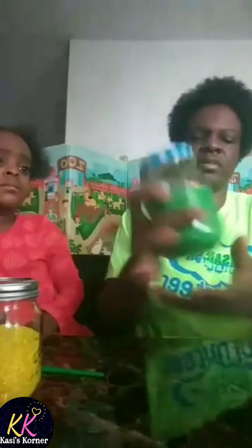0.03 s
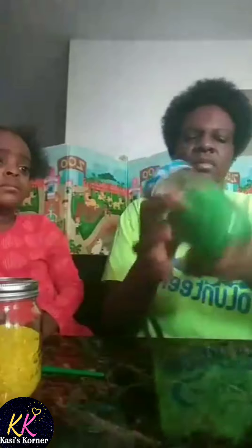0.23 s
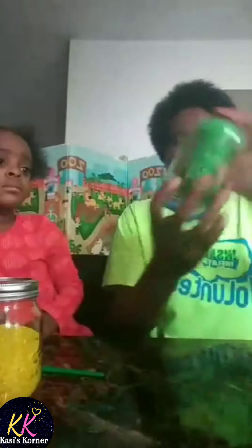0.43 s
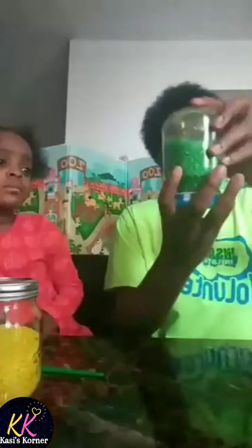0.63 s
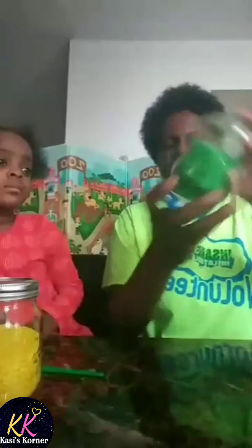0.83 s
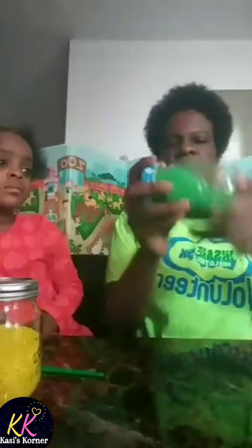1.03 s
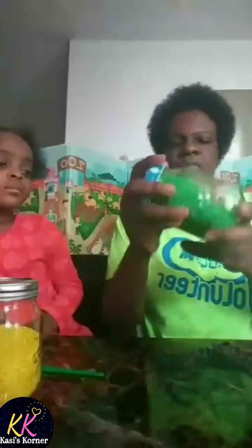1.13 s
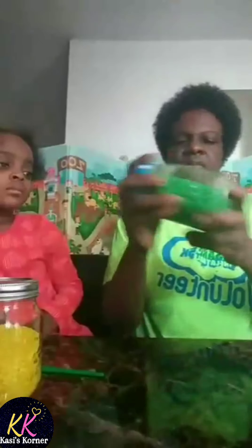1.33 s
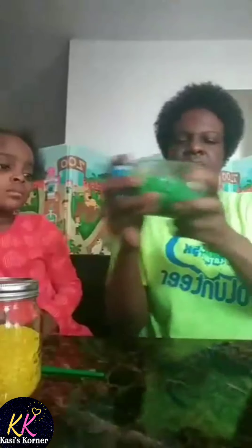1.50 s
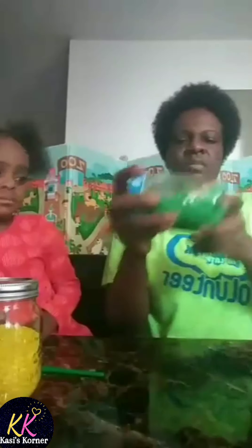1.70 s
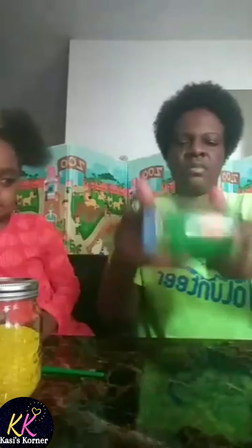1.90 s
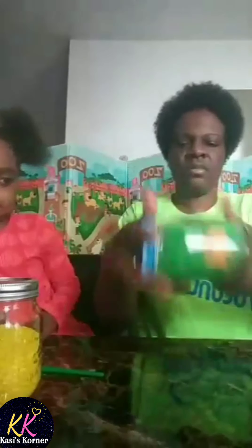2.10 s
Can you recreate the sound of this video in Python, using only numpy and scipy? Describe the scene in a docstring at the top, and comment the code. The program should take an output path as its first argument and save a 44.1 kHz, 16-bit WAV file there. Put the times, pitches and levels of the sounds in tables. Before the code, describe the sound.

Rice rattles and slides in a glass jar as it is turned over and shaken.

```python
"""In a small room, dry rice in a glass jar with a metal lid is turned over and shaken by hand.
Grains slide and patter along the glass and make it ring. At the end of a swing the heap lands
with a crunch, and once it drums loudly on the lid. The jar gives a few sharp clicks, and the
hands bump and rub it dully. Behind it all are a short echo and a faint hiss of air."""
import sys
import numpy as np
from scipy import signal
from scipy.fft import rfft, irfft, next_fast_len
from scipy.io import wavfile

SR = 44100
rng = np.random.default_rng(int(sys.argv[2]) if len(sys.argv) > 2 else 0)


def materialize(psi):
    """Save the field psi as 16-bit PCM at rate SR to the path in sys.argv[1].

    A 1-D psi becomes a single channel; in a 2-D psi each row is a channel.
    """
    bounded = np.clip(np.atleast_2d(psi).T, -1, 1)
    quanta = np.round(bounded * 32767).astype(np.int16)
    wavfile.write(sys.argv[1], SR, quanta)


N = 94815

# The tone of a grain hitting the glass. Each row: frequency in Hz, level in dB.
GRAIN_ON_GLASS = [(90, -35), (170, -24.5), (350, -16), (800, -14.5), (1600, -21.5), (3000, -10.5),
                  (4600, -9.5), (6000, -12.5), (7500, -6.5), (10000, -4.5), (12000, -2), (14100, -4.5)]
# The notes the glass rings at. Each row: frequency in Hz, width in Hz, boost in dB.
GLASS_NOTES = [(5306, 450, 10), (6535, 300, 7), (9015, 450, 12.5), (10550, 520, 3), (11060, 120, 12.5),
               (11400, 69, 10), (11530, 230, 5), (12100, 520, 11.5)]


def amp(db):
    """Turn decibels into a plain multiplier."""
    return 10 ** (np.asarray(db) / 20)


def along(points, hz):
    """Read a curve between its points, on a log frequency scale."""
    freqs, values = np.transpose(points)
    return np.interp(np.log(hz + 1), np.log(freqs + 1), values)


def body(x, tone, notes=(), size=8192):
    """Pass x through an object that colours it with a broad tone and rings at its own notes."""
    hz = np.fft.rfftfreq(size, 1 / SR)
    boost = sum((amp(db) ** 2 - 1) / (1 + (2 * (hz - f) / width) ** 2) ** 2 for f, width, db in notes)
    gain = amp(along(tone, hz)) * np.sqrt(np.abs(1 + boost))
    cepstrum = irfft(np.log(np.maximum(gain, 1e-6)))
    cepstrum[1:size // 2] *= 2  # folding it makes the ring follow the hit, never lead it
    cepstrum[size // 2 + 1:] = 0
    ring = irfft(np.exp(rfft(cepstrum)))
    return signal.fftconvolve(x, ring / np.linalg.norm(ring))[:N]


def grains(per_s, scatter_db, bands=6, band_step_hz=3000):
    """Tiny random hits of uneven size, per_s a second in each pitch band; more are denser, not louder."""
    chance = np.clip(per_s / SR, 1e-4, 1)
    sizes = amp(scatter_db * np.clip(rng.standard_normal((bands, N)), -2, 2))
    sizes *= rng.choice([-1, 1], (bands, N)) / np.sqrt(np.mean(sizes ** 2))
    hits = (rng.random((bands, N)) < chance) * sizes / np.sqrt(chance)
    size = next_fast_len(N)
    offset = np.fft.rfftfreq(size, 1 / SR) / band_step_hz - np.arange(bands)[:, None]
    band_gain = np.sqrt(np.maximum(1 - np.abs(offset), 0))
    return irfft((rfft(hits, size) * band_gain).sum(0), size)[:N]


def swells(rows):
    """A loudness curve: each row rises, holds and fades. A fade time is how long a 60 dB drop takes."""
    t = np.arange(N) / SR
    return sum(np.clip((t - start) / rise, 0, 1)
               * amp(db - 60 * np.maximum(t - start - rise - hold, 0) / fade)
               for start, db, rise, hold, fade in rows)


def blow(start, fade_s, rough_db):
    """One short contact: a snap, then a quickly fading burst of noise."""
    age = np.arange(N) / SR - start
    burst = (age >= 0) * amp(-60 * np.abs(age) / fade_s) * rng.standard_normal(N)
    hit = amp(rough_db) * burst / np.linalg.norm(burst)
    hit[int(start * SR)] += 1  # the snap
    return hit / np.linalg.norm(hit)


def air(level_db=-69):
    """The faint, steady hiss of a still room."""
    # The tone of the hiss. Each row: frequency in Hz, level in dB.
    tone = [(30, -30), (90, -26), (145, 1), (200, -7), (400, -1), (900, -5.5), (1900, -13.5), (4100, -13.5),
            (6900, -20.5), (11800, -14.5)]
    return amp(level_db) * body(rng.standard_normal(N), tone)


def room_echo(x, level_db=-12.5, delay_s=0.007):
    """The walls send back a short, blurred echo whose treble dies first."""
    # How long the echo lasts. Each row: frequency in Hz, fade time in seconds.
    fades = [(150, 0.28), (1000, 0.22), (4000, 0.23), (12000, 0.043)]
    hz, t, noise = signal.stft(rng.standard_normal(SR // 2), SR, nperseg=256)
    tail = signal.istft(noise * amp(-60 * t / along(fades, hz)[:, None]), SR, nperseg=256)[1]
    tail *= np.arange(len(tail)) / SR > delay_s
    return amp(level_db) * signal.fftconvolve(x, tail / np.linalg.norm(tail))[:N]


def hands(bump_width_hz=166, bump_boost_db=9.5):
    """Soft hands bump the jar dully, and skin rubs over it."""
    # The bumps. Each row: start in seconds, level in dB, rise, hold and fade in seconds, pitch in Hz.
    bumps = [(0.453, -65, 0.0068, 0.013, 0.063, 307), (1.277, -55, 0.0092, 0.057, 0.27, 401),
             (1.414, -53.5, 0.004, 0.029, 0.23, 314), (1.531, -54, 0.0052, 0.013, 0.23, 796),
             (1.646, -38.5, 0.0018, 0.027, .13, 205)]
    # The rub. Its row is like a bump's, without the pitch.
    rubs = [(.08, -57, 0.051, 0.047, 0.22)]
    # The tones of a bump and a rub. Each row: frequency in Hz, level in dB.
    bump_tone = [(60, -33), (115, -28), (190, -14.5), (300, -2), (420, 0.5), (490, -10), (570, -3),
                 (700, -3.5), (870, -2.5), (1300, -12), (2300, -10.5), (6000, -24.5)]
    rub_tone = [(100, -33.5), (400, -11.5), (800, -8), (980, -16.5), (1160, 6.5), (1450, -26), (5000, -30)]
    bumping = 0
    for *shape, hz in bumps:
        touch = swells([shape]) * grains(per_s=1500, scatter_db=2.5)
        bumping += body(touch, bump_tone, [(hz, bump_width_hz, bump_boost_db)])
    return bumping + body(swells(rubs) * grains(per_s=2600, scatter_db=7.5), rub_tone)


def clicks():
    """Hard single contacts: the jar clinks in the hands, and grains and clumps tick on the glass."""
    # The clinks and the ticks. Each row: start in seconds, level in dB.
    jar_hits = [(0.1677, -5.5), (0.1856, -15.5), (1.3371, -8)]
    grain_hits = [(.476, -28), (0.545, -43.5), (0.983, -18), (1.4111, -13), (1.621, -10.5), (1.626, -5),
                  (1.946, 4), (1.9579, -7.5), (1.9628, 3), (1.9721, -16), (1.982, -11), (2.07, -30.5)]
    # The tone of a clink. Each row: frequency in Hz, level in dB.
    clink_tone = [(100, -23.5), (1000, -5), (1600, -7), (3900, 4.5), (6200, -9.5), (12200, -3),
                  (13200, -19)]
    # The notes of a clink. Each row: frequency in Hz, width in Hz, boost in dB.
    clink_notes = [(2830, 430, 14.5), (5380, 430, 6), (8160, 1200, 13.5), (14080, 200, 15)]
    clinks = sum(amp(db) * blow(start, fade_s=0.012, rough_db=3.5) for start, db in jar_hits)
    ticks = sum(amp(db) * blow(start, fade_s=0.008, rough_db=10.5) for start, db in grain_hits)
    return body(clinks, clink_tone, clink_notes) + body(ticks, GRAIN_ON_GLASS, GLASS_NOTES)


def lid(hollow_hz=785.4, hollow_width_hz=380):
    """Rice knocks hollowly and patters on the lid, and midway the hands rub faintly on the jar."""
    # The knocks. Each row: start in seconds, level in dB, boost of the hollow note in dB.
    blows = [(0.2607, 2, 15.5), (0.2675, 3.5, 5), (1.337, -23.5, 0), (1.964, -23, 0)]
    # Loose grains on the lid (first and last row) and a faint rub of the hands (middle row).
    # Each row: start in seconds, level in dB, rise, hold and fade in seconds.
    patter_and_rub = [(.262, -37.5, 0.0062, 0.0047, 0.08), (0.8, -67, 0.074, 0.097, 0.81),
                      (1.87, -54.5, 0.042, 0.11, 0.08)]
    # The tone of the lid. Each row: frequency in Hz, level in dB.
    tone = [(30, -26.5), (150, -22.5), (450, -14.5), (720, -2), (1200, 0), (2000, -6), (2350, -17.5),
            (3000, -13), (3900, -6), (5000, -17.5), (12000, -25.5)]
    # The notes the lid rings at. Each row: frequency in Hz, width in Hz, boost in dB.
    notes = [(772, 42, 12), (907, 42, 11), (1024, 34, 7), (1204, 38, 7), (1357, 30, 6), (1692, 30, 6),
             (1946, 30, 8), (2082, 30, 8)]
    knocks = 0
    for start, db, hollow_db in blows:
        hit = amp(db) * blow(start, fade_s=0.009, rough_db=-10)
        knocks += body(hit, tone, notes + [(hollow_hz, hollow_width_hz, hollow_db)])
    return knocks + body(swells(patter_and_rub) * grains(per_s=3100, scatter_db=4), tone, notes)


def heap_landing():
    """The heap lands, and its many tiny hits merge into a crunch."""
    # The landings. Each row: start in seconds, level in dB, rise, hold and fade in seconds.
    landings = [(.236, -24.5, 0.003, 0.0056, 0.1), (.2405, -21.5, 0.005, 0.028, 0.12),
                (1.338, -39.5, 0.0095, 0.017, 0.31), (1.608, -28.5, 0.0057, 0.0089, 0.15),
                (1.852, -38, 0.057, 0.04, 0.05), (1.957, -30, 0.009, 0.0099, 0.14)]
    # The tone of the crunch. Each row: frequency in Hz, level in dB.
    tone = [(150, -44), (450, -23.5), (780, -5.5), (1400, -13), (2300, -13), (2900, -3), (4200, -3),
            (5900, -15), (7000, -9), (8200, -3.5), (9600, -2), (11000, 4), (12000, 6), (12800, -4),
            (14300, -7.5)]
    return body(swells(landings) * grains(per_s=7000, scatter_db=8), tone)


def sliding_rice(level_db=-0.5, grip_damping_db=2):
    """Grains patter along the glass, denser as the flow grows; it rings less under a firm grip."""
    # The flow of rice in each movement of the jar. Each row: time in seconds, level in dB.
    tip = [(0.0, -50), (0.044, -82), (0.186, -47.5), (0.206, -50.5), (0.234, -39.5)]
    settle = [(0.29, -31.5), (0.357, -34.5), (0.425, -38), (0.446, -51), (0.569, -87)]
    turn_back = [(0.66, -82), (0.696, -57.5), (0.708, -40.5), (0.73, -39), (0.76, -42.5), (0.79, -41),
                 (0.852, -35), (0.898, -41.5), (0.98, -38), (1.11, -78)]
    tilt = [(1.265, -72), (1.296, -47.5), (1.354, -43), (1.6, -50)]
    recoil = [(1.652, -39.5), (1.742, -68), (1.808, -68.5)]
    shake = [(1.842, -81.5), (1.859, -62.5), (1.924, -37.5), (1.964, -24), (2.029, -41.5), (2.05, -59),
             (2.098, -87)]
    # Grains set the glass tinkling. Each row: start in seconds, level in dB, rise, hold, fade in seconds.
    tinkles = [(.216, -41.5, 0.0027, .02, 0.077), (.7675, -32.5, .001, 0.015, 0.094),
               (.955, -36.5, 0.0062, 0.011, 0.23)]
    # The tone of the tinkling. Each row: frequency in Hz, level in dB.
    tinkle_tone = [(5000, -58.5), (9800, -30), (10500, -6), (11100, -13), (11900, -10), (13000, -29),
                   (15000, -46)]
    t = np.arange(N) / SR
    times, levels = np.vstack([tip, settle, turn_back, tilt, recoil, shake]).T
    flow_db = np.interp(t, times, levels)
    hits_per_s = 7000 * amp(0.2 * (flow_db + 40))
    patter = amp(flow_db + level_db) * grains(hits_per_s, scatter_db=9.5)
    gripped = t > tilt[0][0]  # from the tilt on, both hands hold the jar
    damped_notes = [(hz, width, boost - grip_damping_db) for hz, width, boost in GLASS_NOTES]
    free = body(patter * ~gripped, GRAIN_ON_GLASS, GLASS_NOTES)
    held = body(patter * gripped, GRAIN_ON_GLASS, damped_notes)
    tinkle = body(swells(tinkles) * grains(per_s=7000, scatter_db=3.5), tinkle_tone, GLASS_NOTES)
    return free + held + tinkle


def scene():
    """The jar, the still air and the jar's echo, in one channel."""
    jar = sliding_rice() + heap_landing() + lid() + clicks() + hands()
    return (jar + air() + room_echo(jar))[None]


def record(dry):
    """Cut away the very highest treble."""
    full_until_hz, silent_from_hz = 14100, 15350
    size = next_fast_len(N + SR // 2)
    gain = np.interp(np.fft.rfftfreq(size, 1 / SR), [full_until_hz, silent_from_hz], [1, 0]) ** 2
    return irfft(rfft(dry, size) * gain, size)[..., :N]


dry = scene()
out = record(dry)
materialize(out)
```